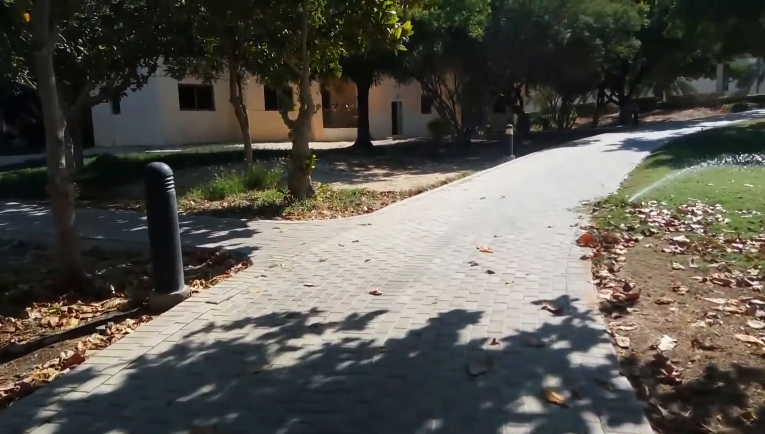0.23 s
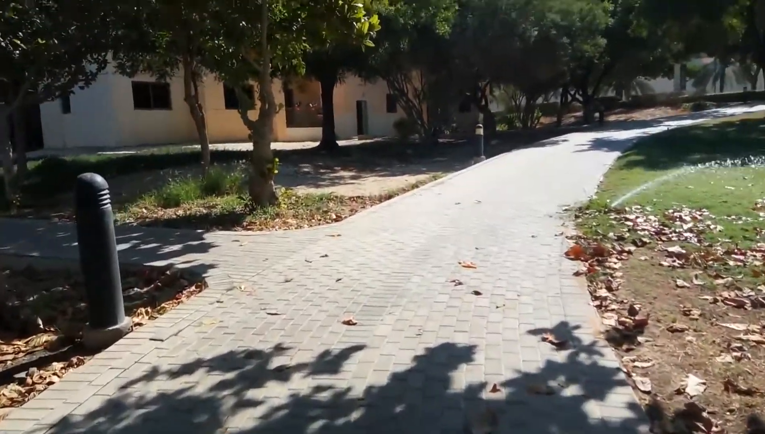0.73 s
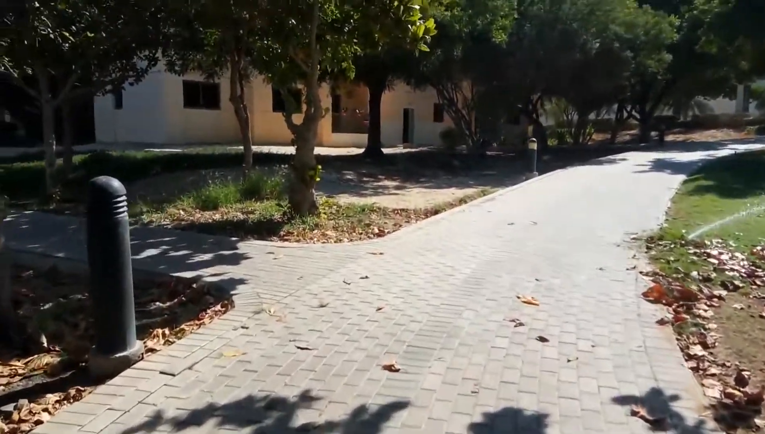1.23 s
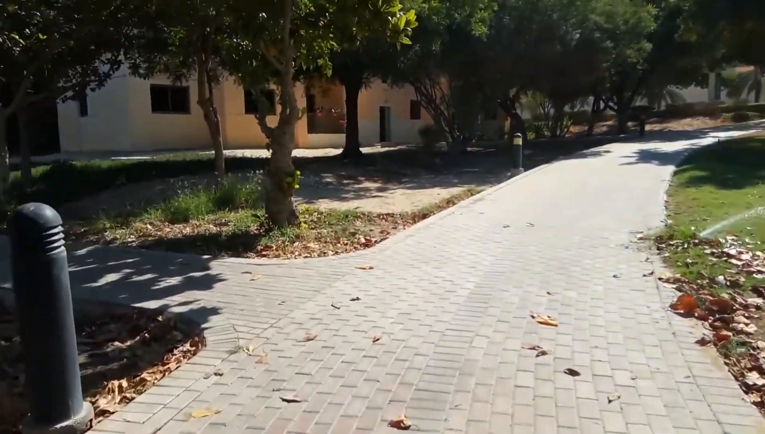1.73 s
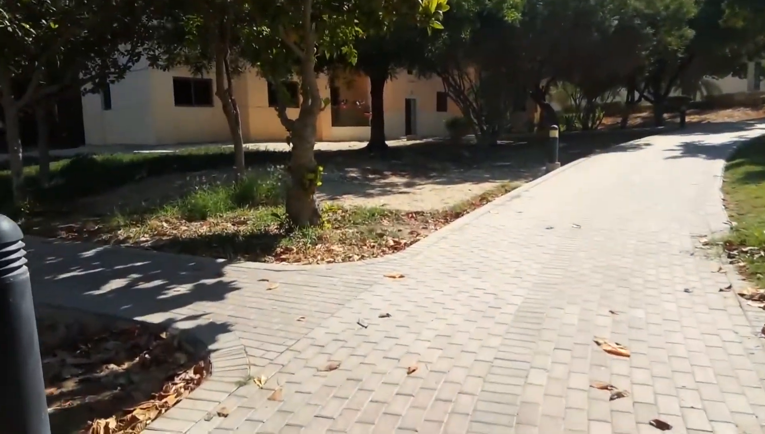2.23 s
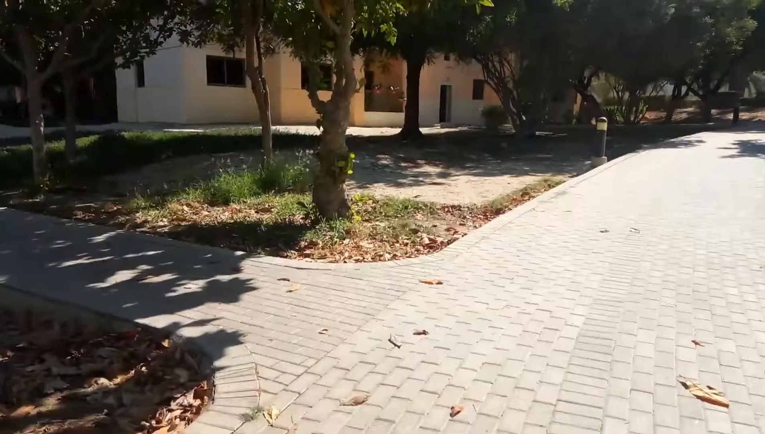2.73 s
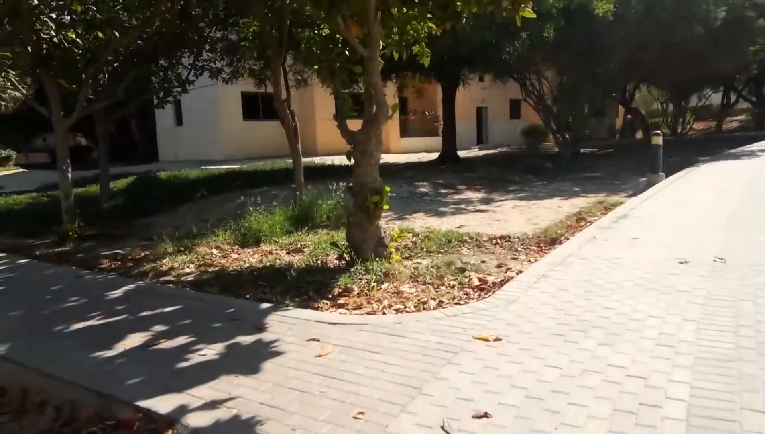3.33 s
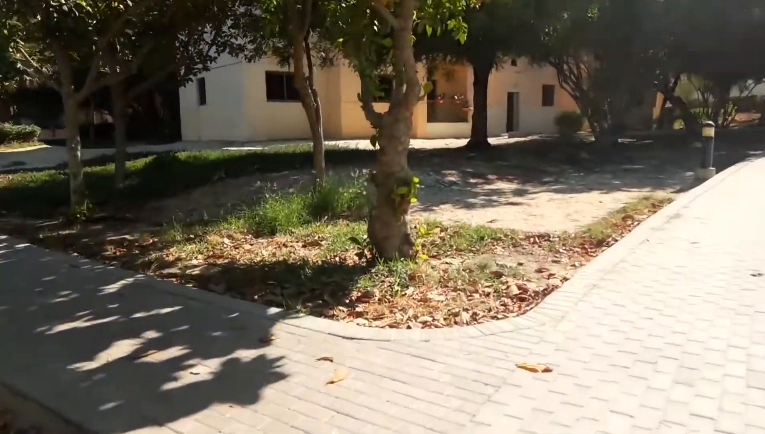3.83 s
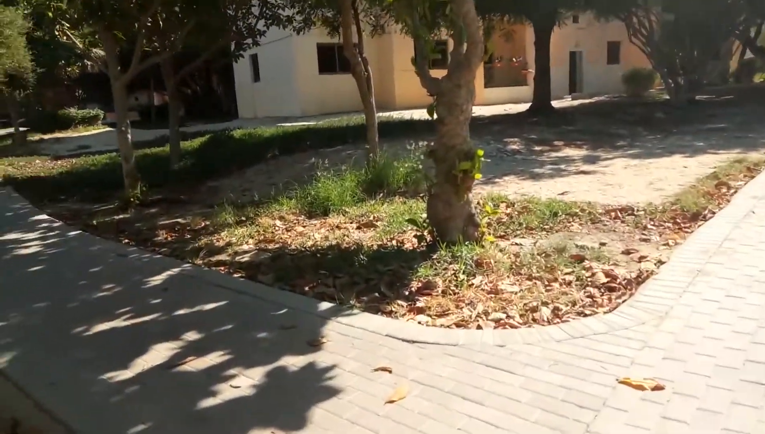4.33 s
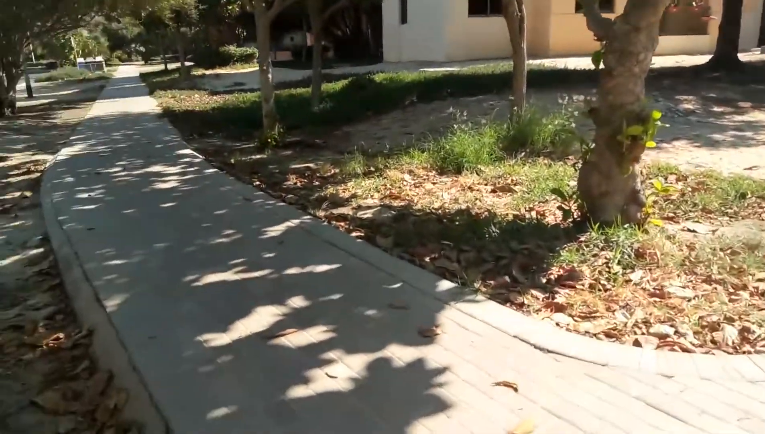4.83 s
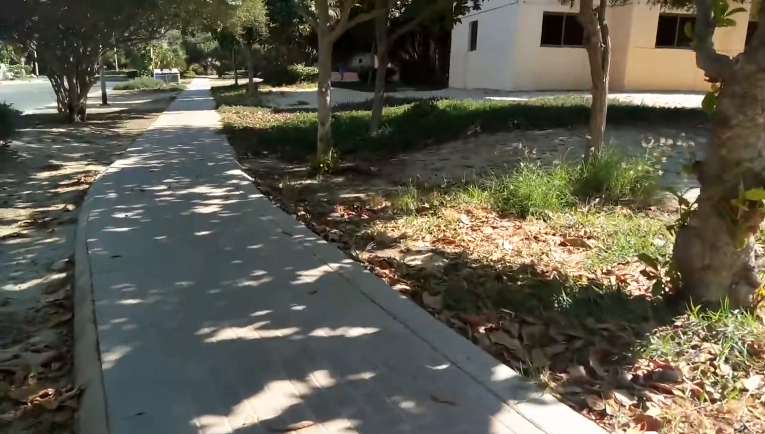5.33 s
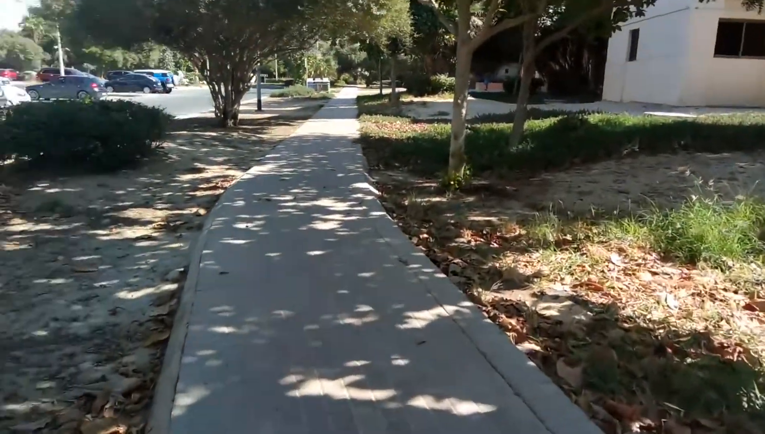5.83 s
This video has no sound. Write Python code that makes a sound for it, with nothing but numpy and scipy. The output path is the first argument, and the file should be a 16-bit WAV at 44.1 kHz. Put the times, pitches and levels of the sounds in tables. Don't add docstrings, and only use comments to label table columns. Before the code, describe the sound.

Bright water spray hisses and patters beside a walker on a paved path, drops crackling on leaves, before wind thumps the microphone.

```python
import sys
import numpy as np
from scipy import signal
from scipy.fft import rfft, irfft, next_fast_len
from scipy.io import wavfile
from scipy.ndimage import uniform_filter1d, map_coordinates

SR = 44100
rng = np.random.default_rng(int(sys.argv[2]) if len(sys.argv) > 2 else 0)


def attenuation_scalar(level_db):
    decades = np.asarray(level_db, float) / 20
    return 10 ** decades


def generate_wav(sig):
    pcm = np.round(np.clip(np.atleast_2d(sig).T, -1, 1) * 32767).astype(np.int16)
    wavfile.write(sys.argv[1], SR, pcm)


N = 267775
LAG_S = 17 / 44100


def unit(x):
    return x / np.sqrt(np.mean(x ** 2, axis=-1, keepdims=True) + 1e-20)


def along(points, hz):
    f, v = np.transpose(points)
    return np.interp(np.log(hz + 1), np.log(f + 1), v)


def curves(rows):
    s, *cols = np.transpose(rows)
    return [np.interp(np.arange(N) / SR, s, c) for c in cols]


def wobble(rate):
    knots = rng.standard_normal(int(N * rate / SR) + 4)
    return map_coordinates(knots, [np.arange(N) * rate / SR])


def filtered(x, response):
    m = next_fast_len(N + SR // 2)
    return irfft(rfft(x, m) * response(np.fft.rfftfreq(m, 1 / SR)), m)[..., :N]


def resonances(modes):
    def response(f):
        total = 0
        for k, (hz, width, db) in enumerate(modes):
            total = total + (-1) ** k * attenuation_scalar(db) * 1j * f * width / (hz * hz - f * f + 1j * f * width)
        return total
    return response


def pair(spectrum, alike, patchy_db, lag=0):
    z = signal.stft(rng.standard_normal((2, N)), nperseg=512)[2]
    field = uniform_filter1d(rng.standard_normal(z.shape[1:]), size=8, axis=0)
    field = uniform_filter1d(field, size=10, axis=1)
    patches = attenuation_scalar(patchy_db * field / field.std())
    own, right = signal.istft(z * patches, nperseg=512)[1][:, :N]
    alike = np.clip(alike, 0, 1)
    late = filtered(right, lambda hz: np.exp(-2j * np.pi * hz * lag))
    left = np.sqrt(1 - alike ** 2) * own - alike * late
    return unit(filtered(np.array([left, right]), lambda hz: attenuation_scalar(along(spectrum, hz))))


def tones(rows):
    out = np.zeros(N + SR)
    for s, length, hz, db in rows:
        t = np.arange(round(length * SR)) / SR
        swell = np.sqrt(abs(np.sin(np.pi * t / length)))
        out[round(s * SR):][:len(t)] += attenuation_scalar(db) * swell * np.sin(2 * np.pi * hz * t)
    return out[:N]


# [time_s, share_0_to_1]
TURNING = [
    (0, 0.04),
    (1.0, 0.35),
    (2.4, 0.39),
    (3.0, 0.67),
    (3.9, 0.69),
    (4.8, 0.96),
    (5.4, 0.9),
    (6.07, 0.76),
]


def turned(before, after):
    share, = curves(TURNING)
    return before + (after - before) * share


# [pitch_hz, level_db_per_hz]
RUMBLE_TONE = [(15, -70), (33, -44), (49, -21), (69, -6), (97, 0), (199, -8.5), (233, -6.5), (372, -16),
               (600, -27), (780, -39), (1320, -120)]


def traffic_rumble():
    rumble = attenuation_scalar(-50.5 + wobble(5.8)) * pair(RUMBLE_TONE, 0.92, patchy_db=2.5)
    body_shade = [(120, 0), (400, -6.0)]
    rumble[0] = filtered(rumble[0], lambda hz: attenuation_scalar(along(body_shade, hz)))
    return rumble


# [pitch_hz, level_db_per_hz]
ROAD_TONE = [(350, -37), (480, -12), (650, -2.5), (850, 4.5), (1050, -2.5), (1400, -62), (1900, -29)]
# [middle_s, length_s, rise_db]
CAR_PASSES = [
    (.9, 1, 2),
    (2.3, 0.76, 3),
    (4.85, 0.4, 8),
    (5.87, 0.21, 1),
]


def road():
    t = np.arange(N) / SR
    passing_db = sum(db * np.exp(-(2 * (t - s) / length) ** 2) for s, length, db in CAR_PASSES)
    level_db = turned(-62, -69) + passing_db + 6.0 + wobble(4.9)
    return attenuation_scalar(level_db) * pair(ROAD_TONE, 0.48, patchy_db=3.0) * attenuation_scalar([[-5], [0]])


# [pitch_hz, level_db_per_hz]
WASH_TONE = [(700, -14), (1000, 4.5), (1500, 2), (2200, 3), (3000, -0.5), (3400, -6.5), (4400, -23.5)]
# [start_s, length_s, rise_db]
FOLIAGE_PUFFS = [(3.113, 0.048, 5.5), (3.362, 0.049, 9.5), (3.443, 0.039, 4.5), (3.55, 0.099, 4.5),
                 (3.72, 0.076, 5.5), (3.873, 0.11, 4.5), (3.997, 0.056, 6), (4.265, 0.072, 0.5),
                 (1.571, 0.033, 7.5), (2.363, 0.13, 6.5), (1.267, 0.029, 1), (4.146, 0.1, -1.5),
                 (4.581, 0.026, 6)]


def far_wash():
    t = np.arange(N) / SR
    puffs_db = sum(db * (t > s) * (t < s + length) for s, length, db in FOLIAGE_PUFFS)
    level_db = turned(-66.5, -57) + puffs_db + 5.0 + 0.46 * wobble(12)
    return attenuation_scalar(level_db) * pair(WASH_TONE, 0.25, patchy_db=3.5, lag=LAG_S) * attenuation_scalar([[-6], [0]])


# [pitch_hz, width_hz, level_db]
HUM_TONES = [
    (230, 11, -74.5),
    (90, 2.8, -71.5),
    (171, 2.8, -71),
]
# [start_s, length_s, pitch_hz, peak_db]
HUM_SWELLS = [(.05, 0.62, 90, -54), (.72, 0.24, 238.3, -59.5), (.75, 0.12, 125.4, -53),
              (1.1, 0.37, 233.4, -65), (1.4, 0.22, 228.3, -58.5), (1.38, 1, 116.2, -49.5),
              (1.95, 0.31, 233.7, -60.5), (2.2, 0.56, 230, -56), (2.1, 0.37, 90.5, -55),
              (3.4, 0.31, 229, -56), (4.25, 0.33, 228.7, -59.5), (5.1, 0.5, 106, -51),
              (5.35, 0.58, 225.7, -60)]


def machine_hum():
    hum = tones(HUM_SWELLS)
    for hz, width, db in HUM_TONES:
        hum = hum + attenuation_scalar(db) * unit(filtered(rng.standard_normal(N), resonances([(hz, width, 0)])))
    return np.array([-.8 * np.roll(hum, shift=40), hum])


# [start_s, length_s, pitch_hz, peak_db]
BIRD_CHIRPS = [
    (1.272, .004, 3100, -44),
    (1.295, .03, 3000, -50),
    (1.325, .033, 2975, -49),
    (1.79, .085, 2975, -46),
    (1.87, .08, 2950, -54),
    (3.8, .03, 2850, -55),
    (5.48, .05, 2550, -55),
]


def birds():
    return attenuation_scalar(2 * wobble(70) + 2.5) * tones(BIRD_CHIRPS) * np.array([[-.4], [1]])


# [time_s, level_db, pitch_hz]
CAW_COURSE = [
    (4.645, -60, 188),
    (4.69, -46.5, 190),
    (4.85, -48, 190),
    (4.885, -65, 186),
]
# [pitch_hz, width_hz, level_db]
CROW_THROAT = [
    [(980, 340, 1), (1580, 360, 2), (2200, 430, -14), (2800, 480, -8)],
    [(998, 87, -7.5), (1542, 96, 1.5), (1990, 290, -9.5), (2800, 370, -9)],
]


def crow():
    db, hz = curves(CAW_COURSE)
    t = np.arange(N) / SR
    cycles = np.cumsum(hz * (1 + .025 * wobble(50))) / SR
    weak = 1 - 0.5 * (np.floor(cycles) % 2)
    pulses = np.diff(np.floor(cycles), prepend=0) * weak * attenuation_scalar(2.2 * wobble(150))
    breath = rng.standard_normal(N) * weak
    calling = (t > CAW_COURSE[0][0]) * (t < CAW_COURSE[-1][0])
    source = attenuation_scalar(db) * (unit(pulses) + 1.15 * unit(breath)) * calling
    scatter = rng.standard_normal((2, SR // 10)) * np.exp(-t[:SR // 10] / .007)
    heard = signal.fftconvolve(source[None], unit(scatter), axes=1)[:, :N]

    def edge(f):
        return 1 / (1 + (f / 3150) ** 24) / (1 + (750 / (f + 1)) ** 8)

    voice = [filtered(x, lambda f: resonances(modes)(f) * edge(f)) for x, modes in zip(heard, CROW_THROAT)]
    return unit(np.array(voice)) * np.std(source) * attenuation_scalar([[0], [5]])


# [time_s, level_db]
GUST_COURSE = [
    (5.75, -86),
    (5.762, -30.5),
    (5.79, -42),
    (5.85, -58),
    (5.91, -71),
    (5.925, -37),
    (6.02, -38),
    (6.045, -33),
    (6.07, -36),
]
# [pitch_hz, level_db_per_hz]
FLUTTER_TONE = [(25, -53), (50, -18), (90, 7.5), (130, -3), (200, -9), (300, -15.5), (420, -50)]
# [start_s, length_s, pitch_hz, peak_db]
WIND_EDDIES = [
    (5.757, 0.015, 172, -33.5),
    (5.76, 0.037, 77.5, -35),
    (5.8, 0.043, 97.5, -43),
    (5.919, 0.028, 97.8, -29.5),
    (5.96, 0.02, 97, -27),
    (5.958, 0.015, 248, -42),
    (5.989, 0.028, 111, -25.5),
    (5.99, 0.024, 184, -35.5),
    (6.02, 0.042, 90, -23.5),
    (6.03, 0.035, 194, -40.5),
]


def gust():
    db, = curves(GUST_COURSE)
    blowing = np.arange(N) / SR > GUST_COURSE[0][0]
    flutter = attenuation_scalar(db - 3.5) * pair(FLUTTER_TONE, 0, patchy_db=-1.5)[0] * blowing
    return (flutter + tones(WIND_EDDIES)) * np.array([[1], [.03]])


# [start_s, peak_db, pitch_hz, life_s]
CAMERA_KNOCKS = [(.33, -31.5, 640, 0.0028), (0.972, -34, 1190, 0.0034), (1.58, -35, 1500, 0.0016),
                 (2.159, -41.5, 1170, 0.0033), (2.68, -40, 800, 0.0028), (3.29, -33.5, 800, 0.0023),
                 (3.361, -37, 1300, 0.0034), (3.88, -33, 790, 0.002), (4.575, -44, 1200, 0.004),
                 (4.72, -29, 450, 0.0021), (5.1, -29, 574, 0.0017), (5.689, -34, 920, 0.0033)]


def steps():
    out, t = np.zeros(N + SR), np.arange(SR // 30) / SR
    for s, db, hz, life in CAMERA_KNOCKS:
        swell = t / life * 2 * np.exp(1 - 2 * t / life)
        out[round(s * SR):][:len(t)] += attenuation_scalar(db) * np.sin(2 * np.pi * hz * t) * swell
    return out[:N] * np.array([[-.75], [1]])


# [start_s, fade_s, rise_db]
JET_SLAPS = [
    (.74, 0.041, 7.5),
    (1.272, 0.051, 9),
    (2.3, 0.14, 3.5),
    (5.5, 0.088, 5),
    (5.83, 0.54, 0.5),
]


def slaps():
    t = np.arange(N) / SR
    return sum(db * (t > s) * np.exp(-abs(t - s) / fade) for s, fade, db in JET_SLAPS)


# [time_s, hiss_db, patter_over_hiss_db]
SPRAY_COURSE = [(0, -43, -6.5), (.8, -41, -4), (1.05, -39, -3), (1.3, -39, -1.5), (1.87, -40.5, 1.5),
                (2.05, -38, -2), (2.33, -40, 5), (2.45, -35, -2), (2.57, -39.5, -3), (2.69, -38.5, 2.5),
                (3.05, -37.5, -10.5), (3.3, -36.5, -12), (3.84, -37.5, -15.5), (4.5, -39.5, 2),
                (5.0, -38.5, -12.5), (5.2, -36.5, -30), (5.5, -40, -16), (6.07, -41.5, -4)]
# [pitch_hz, level_db_per_hz]
PORT_RING = [(3530, -24), (6000, -16), (7770, -11.5), (8900, -7.5), (10200, 1.5), (10800, 2.5),
             (11200, -7.5), (12000, -16.5), (14600, -22.5), (15500, -45), (15800, -60), (16000, -68)]
# [pitch_hz, level_db_per_hz]
SPLASH_TONE = [(1470, -31.5), (2500, -10.5), (3700, -13), (4120, -7.5), (7000, -9.5), (9000, -2),
               (11700, -33.5), (19800, -120)]


def hiss_and_splash():
    hiss_db, patter_db = curves(SPRAY_COURSE)
    splash_db = turned(-13, -15) + 0.21 * patter_db + slaps()
    swell_db = 0.39 * wobble(8.2) + 0.72 * wobble(40)
    hiss = attenuation_scalar(hiss_db + 4.5 + swell_db) * pair(PORT_RING, 0.14, patchy_db=1.48, lag=LAG_S)
    splash = pair(SPLASH_TONE, 0.09, patchy_db=2.5, lag=LAG_S)
    return hiss + attenuation_scalar(hiss_db + splash_db + 7.0 + 0.49 * swell_db) * splash


def snaps(s, db, hz, pan_db, life):
    t = np.arange(SR // 150) / SR
    click = np.sin(2 * np.pi * hz[:, None] * t) * np.exp(-t / life)
    rustle_shape = 0.23 * np.exp(-t / 0.0025) * (1 - np.exp(-t / 0.000072))
    luck = rng.standard_normal((len(s), 2 * len(t) + 1))
    left_lag = LAG_S * (1 + 0.13 * luck[:, -1])
    left_grit, right_grit = luck[:, :len(t)], luck[:, len(t):-1]
    out = []
    for lag, gain, grit in ((left_lag, -attenuation_scalar(pan_db), left_grit), (0, 1, right_grit)):
        drops = (gain * attenuation_scalar(db))[:, None] * (click + grit * rustle_shape)
        at = np.round((s + lag) * SR).astype(int)[:, None] + np.arange(len(t))
        out.append(np.bincount(at.ravel(), drops.ravel(), N + SR)[:N])
    return np.array(out)


def patter():
    hiss_db, patter_db = curves(SPRAY_COURSE)
    luck = rng.random((3000, 3))
    sizes_db = -4.5 * np.log(luck[:, 1] + 0.14)
    small = snaps(luck[:, 0] * N / SR, sizes_db, 6000 + 6000 * luck[:, 2], 0, life=0.00014)

    def tone(hz):
        return attenuation_scalar(0.63 * along(PORT_RING, hz) + 1.3 * along(SPLASH_TONE, np.minimum(hz, 6000)))

    return attenuation_scalar(hiss_db + patter_db + 1.0) * unit(filtered(small, tone))


# [start_s, peak_db, pitch_hz, left_minus_right_db]
CLEAR_DROPS = [(1.0269, -18, 10700, -2), (1.1833, -21, 10000, -13), (1.203, -27, 10600, -7),
               (1.244, -28, 10500, 1), (1.257, -22, 10600, -6), (1.2725, -31, 10500, -5),
               (1.3432, -23, 9640, -3), (1.357, -21.5, 10300, -14), (1.4321, -21.5, 10500, -7),
               (1.5656, -29, 10600, -10.0), (1.5953, -33, 10300, -17), (1.783, -23, 10500, -9),
               (1.807, -23.5, 10700, -10.0), (1.819, -21.5, 10600, -1.5), (1.8833, -17.5, 10500, -9),
               (1.92, -19, 10700, -7), (1.984, -32, 10800, 3), (2.023, -26, 10700, -1),
               (2.0796, -21, 10800, -5), (2.205, -23, 10500, -4), (2.2488, -16.5, 9800, -7),
               (2.3146, -14, 10500, -3), (2.3346, -24, 10500, -9.5), (2.365, -19.5, 9700, -10.0),
               (2.386, -19, 9880, -13), (2.4226, -10.5, 11200, -11), (2.5567, -14.5, 10700, -16.5),
               (2.5947, -18, 10500, -17), (2.7167, -20, 10300, -14), (2.7535, -19, 10200, -19),
               (1.053, -28, 9900, -6), (1.0594, -25, 10500, -11), (1.2725, -22, 3300, -5),
               (1.2726, -27, 7000, -5), (1.2998, -17, 8600, -2), (1.2999, -21, 6500, -4),
               (2.096, -22, 13000, -8), (2.2642, -19, 7400, -4), (2.4318, -16, 11000, -12),
               (2.4454, -16, 13000, -17), (2.455, -19, 10500, -9), (2.468, -13, 13000, -8),
               (2.565, -24, 10700, -11), (2.6374, -21.5, 8800, -10)]
# [start_s, peak_db, pitch_hz]
LESSER_DROPS = [(0.9964, -29, 7000), (1.1123, -28, 8000), (1.3654, -26, 7000), (1.474, -27, 9500),
                (1.5, -27, 9500), (1.5814, -24, 9800), (1.6394, -26, 10300), (1.7035, -25, 9690),
                (1.8324, -27, 9730), (1.9554, -26, 9800), (1.9864, -22, 8000), (1.995, -24, 8610),
                (2.0044, -27, 11000), (2.03, -28, 10500), (2.0384, -24, 9000), (2.0542, -24, 10200),
                (2.0624, -24, 8720), (2.0906, -25, 8700), (2.094, -22, 9400), (2.101, -24, 10900),
                (2.1114, -26, 10900), (2.1234, -26, 10600), (2.1384, -28, 10700), (2.149, -25, 10000),
                (2.1528, -16, 8000), (2.153, -19, 5500), (2.1884, -28, 8800), (2.1941, -26, 10000),
                (2.2144, -27, 10500), (2.2234, -28, 10500), (2.2283, -27, 8300), (2.233, -26, 6500),
                (2.2044, -21, 8600), (2.2764, -28, 10800), (2.3645, -22, 9000), (2.373, -24, 10500),
                (2.4144, -25, 11100), (2.4394, -24, 10800), (2.4597, -23, 10900), (2.473, -19, 10700),
                (2.4864, -22, 10600), (2.499, -24, 10500), (2.5144, -25, 10600), (2.5749, -22, 10400),
                (2.6333, -22, 11500), (2.6868, -26, 9500), (2.8284, -30, 9000)]
# [start_s, peak_db]
FINE_DROPS = [(.382, -27), (0.6554, -31), (.738, -37.5), (.9363, -38), (1.28, -25), (1.4772, -26),
              (1.5055, -32), (1.532, -30), (1.6697, -26), (1.7177, -24), (1.779, -31), (1.8873, -26),
              (1.9315, -35), (2.1, -25), (2.3705, -24), (2.41, -21), (2.424, -15), (2.4831, -21),
              (2.73, -25), (2.8143, -40), (2.89, -28), (3.024, -27), (3.2269, -23), (3.3116, -30),
              (3.3422, -25), (3.3503, -29), (3.3749, -24), (3.4517, -26), (3.6979, -31), (3.7153, -30),
              (3.7232, -27), (3.8846, -26), (4.0224, -23.5), (4.1202, -30), (4.1641, -29), (4.2247, -38),
              (4.3321, -33), (4.3513, -28), (4.404, -30), (4.5802, -33), (4.9421, -27.5), (5.002, -24.5),
              (5.6479, -30)]
# [start_s, peak_db]
TREE_DRIPS = [(0.3698, -30), (0.62, -27), (0.958, -33.5), (2.878, -30), (2.9233, -17), (2.978, -25),
              (3.169, -22), (3.259, -23), (3.4182, -24), (3.4483, -21), (3.4765, -19.5), (4.108, -28),
              (4.465, -20.5), (4.4885, -18), (4.7448, -24), (4.8523, -25), (4.9957, -22), (5.026, -22),
              (5.1403, -25), (5.1807, -21), (5.2473, -25), (5.927, -26.5)]


def nearest_drops():
    drops = CLEAR_DROPS
    drops += [(s, db - 2, hz, -3) for s, db, hz in LESSER_DROPS]
    fine_pan_db, drip_pan_db = turned(-5, -17), turned(-15, -20)
    drops += [(s, db, 10300, fine_pan_db[round(s * SR)]) for s, db in FINE_DROPS]
    drops += [(s, db, 10300, drip_pan_db[round(s * SR)]) for s, db in TREE_DRIPS]
    s, db, hz, pan_db = np.transpose(drops)
    ring = resonances([(10500, 1300, 13.0), (6350, 6500, -3.0)])

    def port(f):
        return ring(f) / (1 + (f / 15000) ** 4) / (1 + (3300 / (f + 1)) ** 4)

    return filtered(snaps(s + 0.00087, db + 6.5, hz, pan_db, life=2.15 / hz[:, None]), port)


# [pitch_hz, level_db]
LEFT_SHADOW = [(4000, 3), (7000, 3.5), (10500, -3), (12500, -16), (15000, -48)]


def sprinkler():
    sides = np.array([attenuation_scalar(turned(-4.5, -11)), np.ones(N)])
    left, right = sides * (hiss_and_splash() + patter()) + nearest_drops()
    return np.array([filtered(left, lambda hz: attenuation_scalar(along(LEFT_SHADOW, hz))), right])


def scene():
    background = traffic_rumble() + road() + far_wash() + machine_hum()
    return background + birds() + crow() + gust() + steps() + sprinkler()


def low_pass(x):
    return signal.sosfilt(signal.butter(12, 16460, fs=SR, output="sos"), x)


# [pitch_hz, level_db]
FAINTEST_KEPT = [(1000, -100), (1600, -94), (2400, -82), (3000, -84), (3600, -80), (4200, -79.5),
                 (5200, -78.5), (7000, -77), (9000, -79.5), (11300, -92), (11900, -75), (13000, -77),
                 (14500, -80), (15500, -87), (16400, -70)]
# [time_s, rise_db, further_rise_above_4300_hz_db]
LIMIT_RISE = [
    (0, 0.5, 0),
    (.9, 1, 0.5),
    (1.4, 2.5, 1.5),
    (2.0, 2, 1),
    (2.6, 1, 0),
    (3.2, 0, -1),
    (4.5, -1.5, -1.5),
    (5.2, -3, -1),
    (6.07, -3.5, -1),
]


def thin(z, limit_db):
    power = uniform_filter1d(abs(z) ** 2, size=4, axis=1)
    return z * (uniform_filter1d(power, size=2, axis=2) > attenuation_scalar(2 * limit_db))


def record(dry):
    blocks = dict(nperseg=2048, noverlap=1024, window=("tukey", .7))
    hz, s, z = signal.stft(dry, SR, **blocks)
    pitch = hz[:, None]
    at = np.minimum(s * SR, N - 1).astype(int)
    all_db, top_db = curves(LIMIT_RISE)
    loud_db = 10 * np.log10((abs(z[:, hz > 2000]) ** 2).sum(axis=(0, 1)) + 1e-12)
    bands = rng.standard_normal((2, len(hz) // 6 + 1, len(s)))
    bands = 1.5 * uniform_filter1d(bands, size=2, axis=2).repeat(6, axis=1)[:, :len(hz)]
    rise_db = 0.49 + 0.45 * uniform_filter1d(loud_db - np.median(loud_db), size=5) + 2.6 * bands
    rise_db = rise_db + all_db[at] + (pitch > 4300) * top_db[at]
    rise_db[0, hz > 11300] -= 8
    limit_db = along(FAINTEST_KEPT, hz)[:, None] + rise_db
    z = z * (pitch < 14500 + 690 * np.round(np.clip(bands[0, 0], -2, 1.4)))
    mid, side = thin(np.array([z[0] + z[1], z[0] - z[1]]) / 2, limit_db)
    paired = (pitch < 5700) & (uniform_filter1d(rng.random(len(s)), size=4) < .66)
    z = np.where(paired, [mid + side, mid - side], thin(z, limit_db))
    thinned = signal.istft(z, SR, **blocks)[1][:, :N]
    sharp = uniform_filter1d(dry[1] ** 2, size=128) > attenuation_scalar(35) * np.median(dry[1] ** 2)
    whole = uniform_filter1d(1. * sharp, size=256)
    mix = thinned + (dry - thinned) * whole
    return low_pass(mix)


dry = scene()
out = record(dry)
generate_wav(out)
```